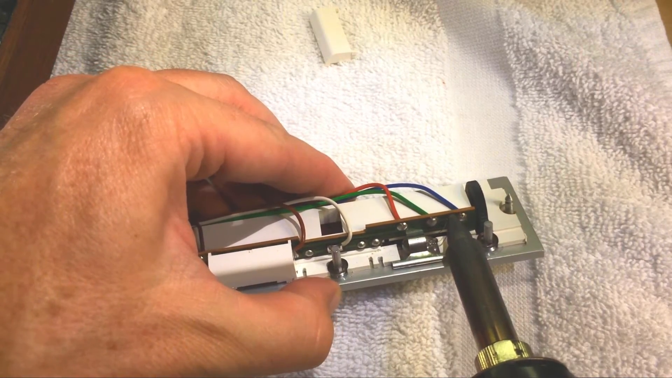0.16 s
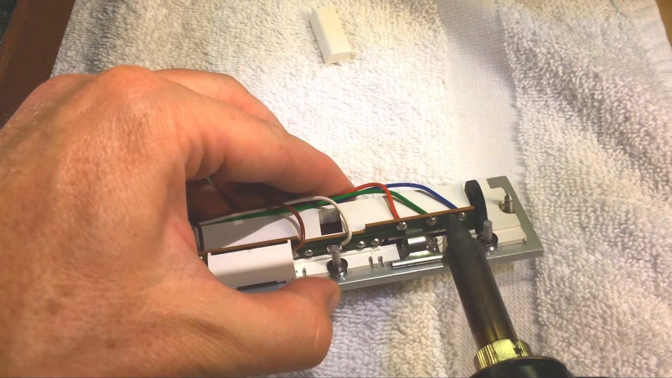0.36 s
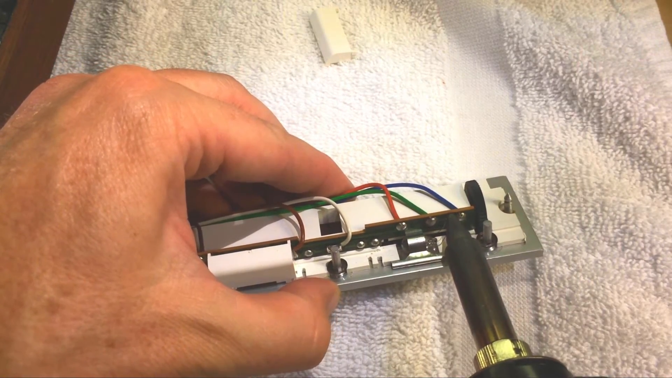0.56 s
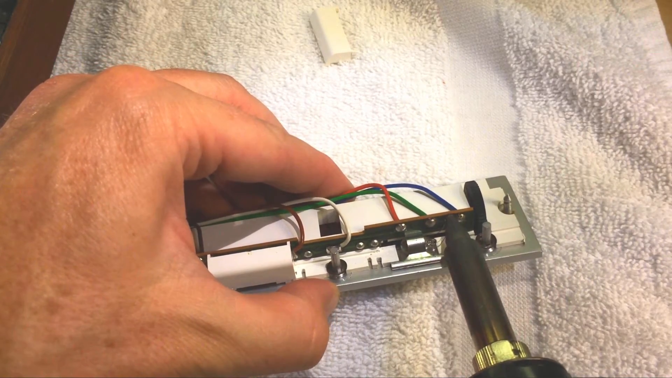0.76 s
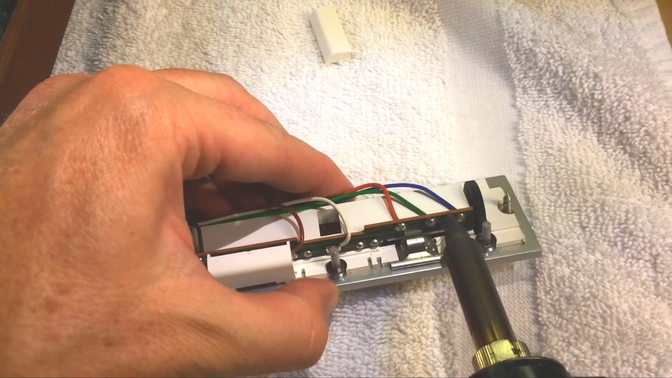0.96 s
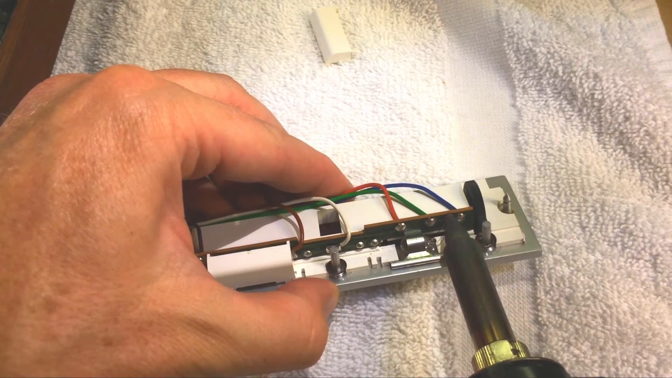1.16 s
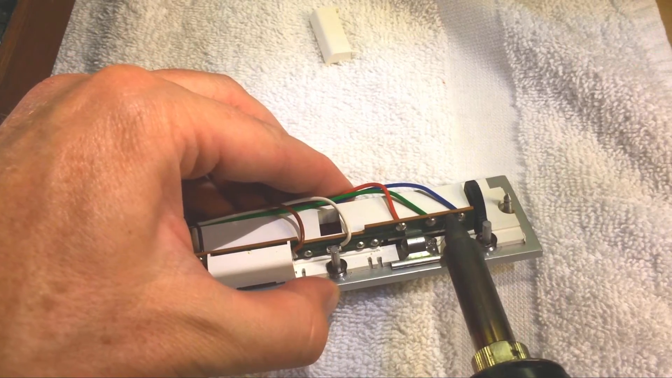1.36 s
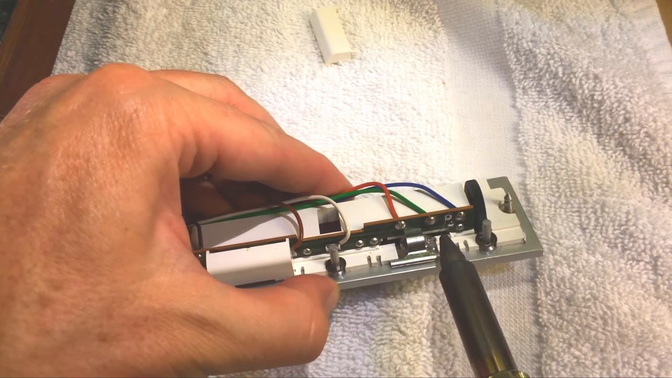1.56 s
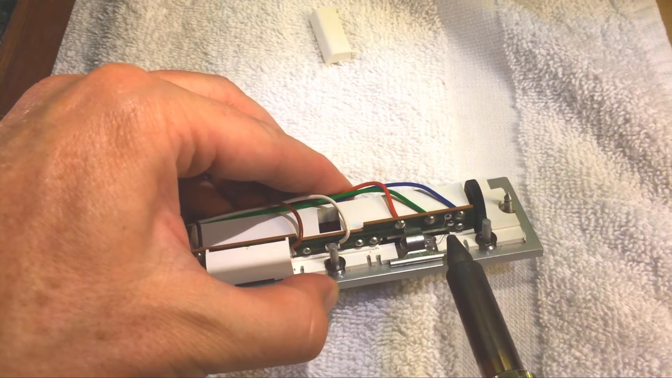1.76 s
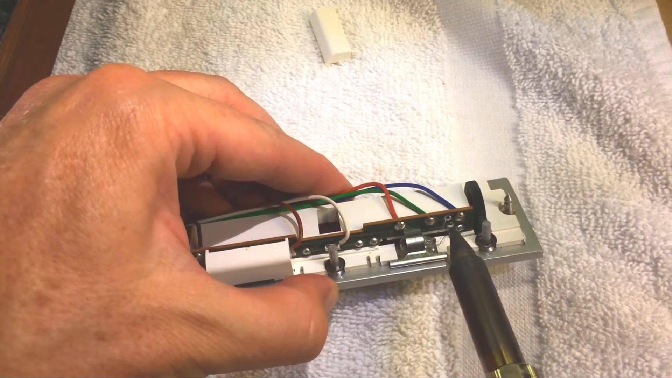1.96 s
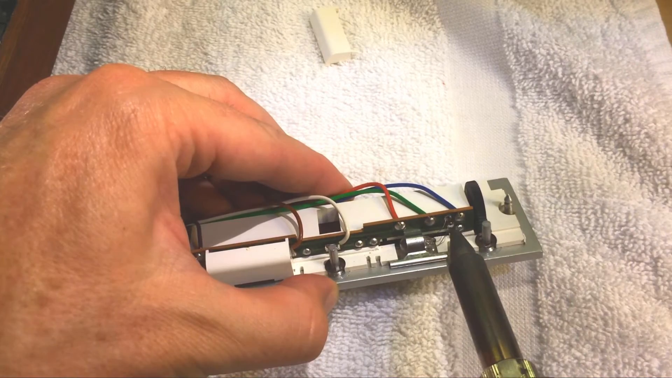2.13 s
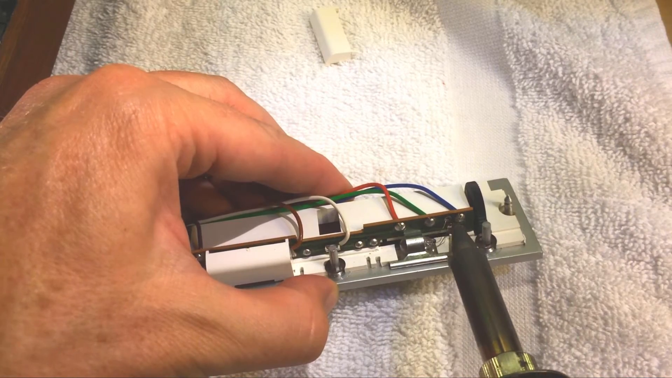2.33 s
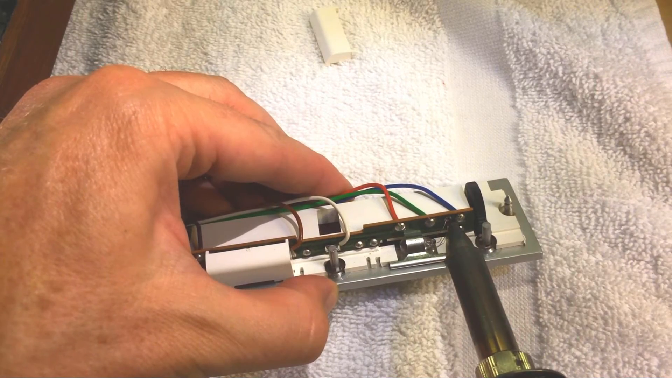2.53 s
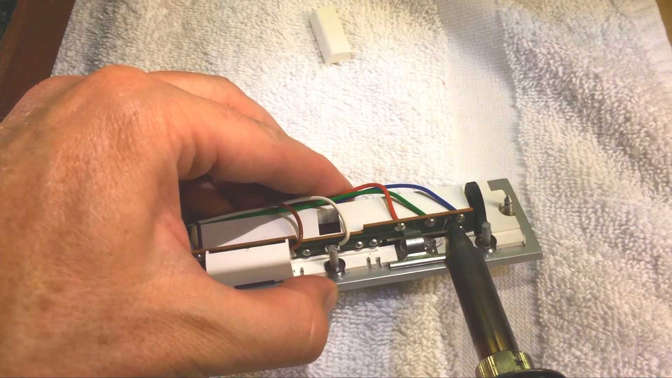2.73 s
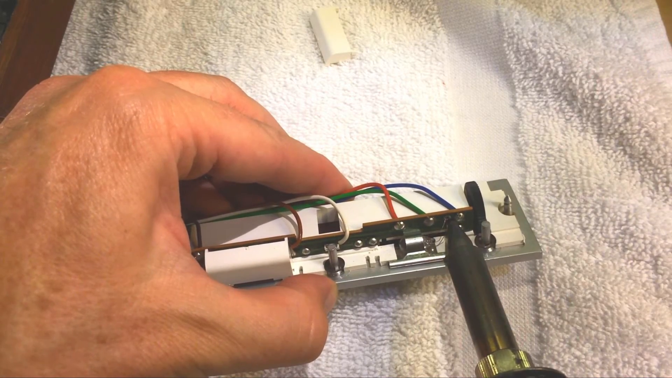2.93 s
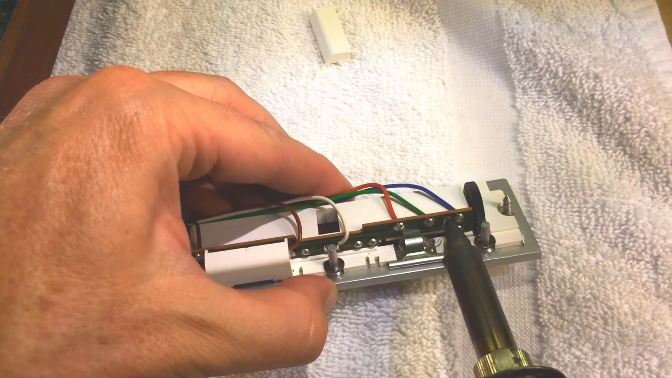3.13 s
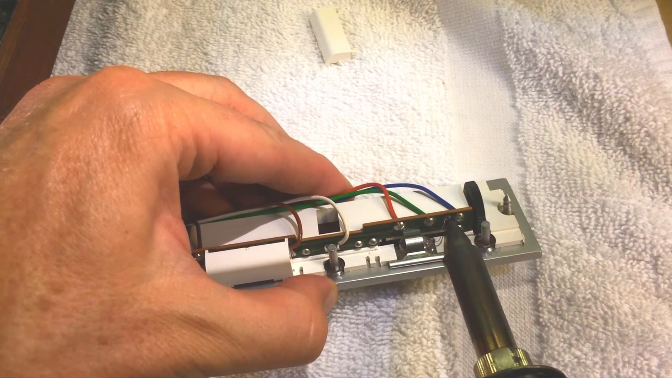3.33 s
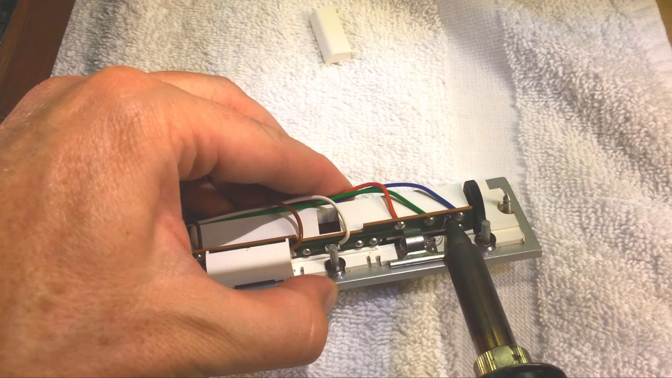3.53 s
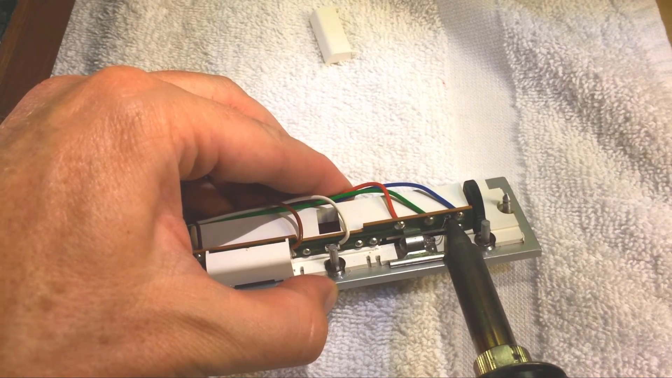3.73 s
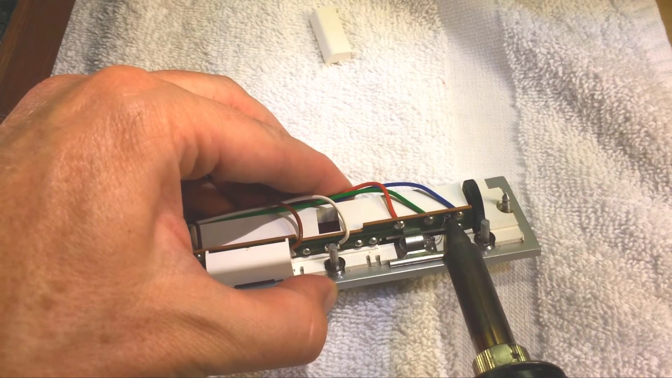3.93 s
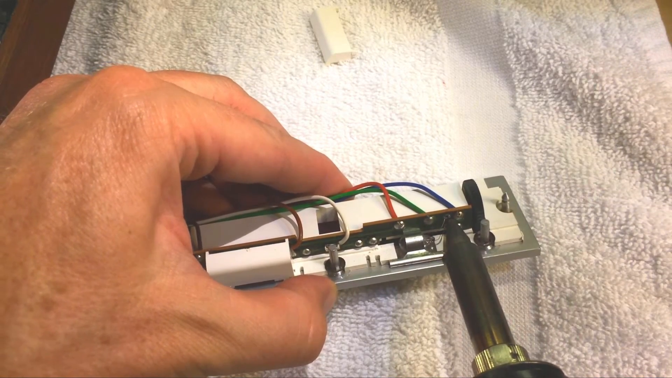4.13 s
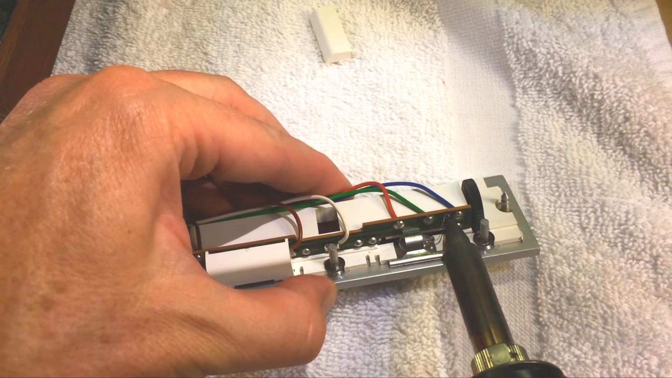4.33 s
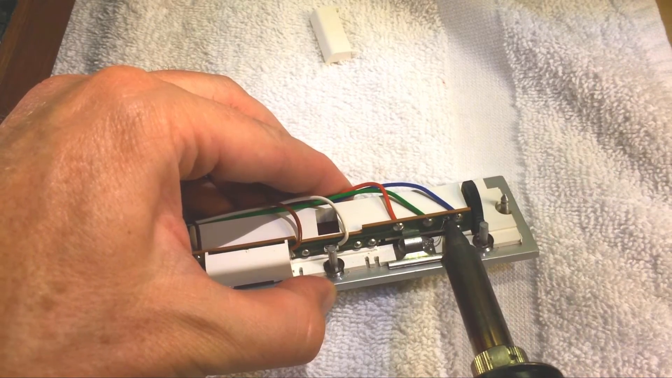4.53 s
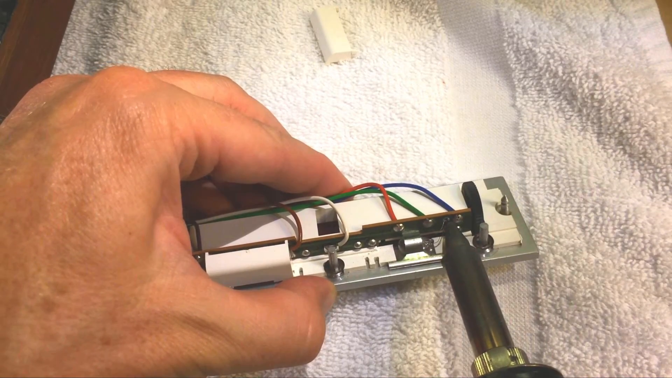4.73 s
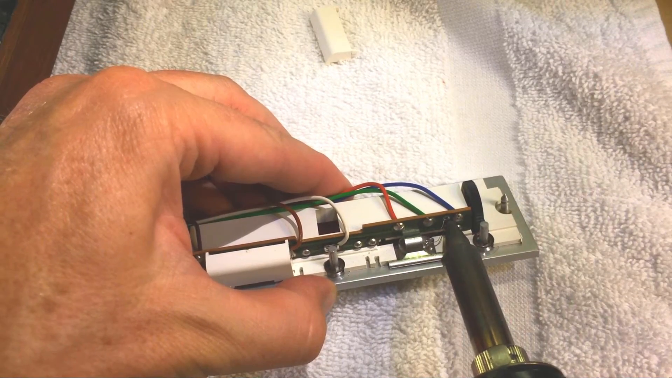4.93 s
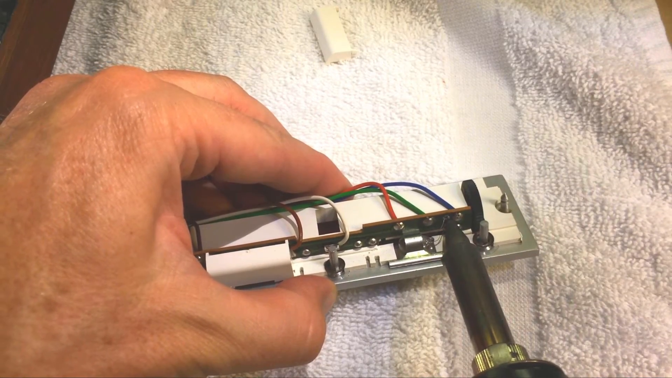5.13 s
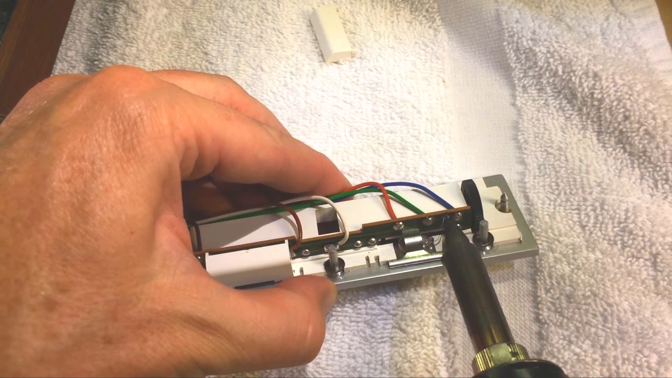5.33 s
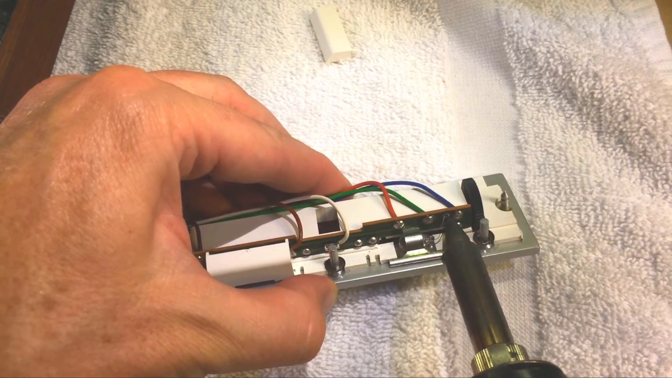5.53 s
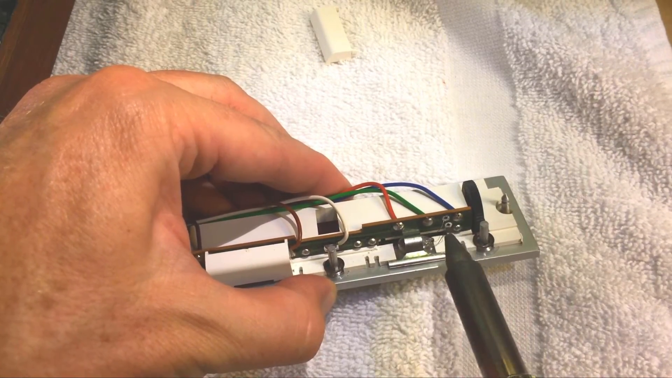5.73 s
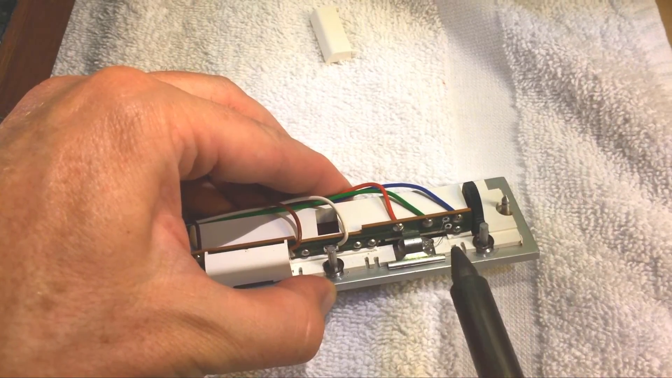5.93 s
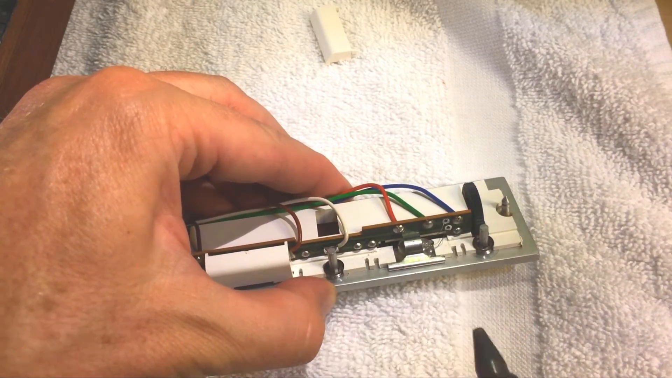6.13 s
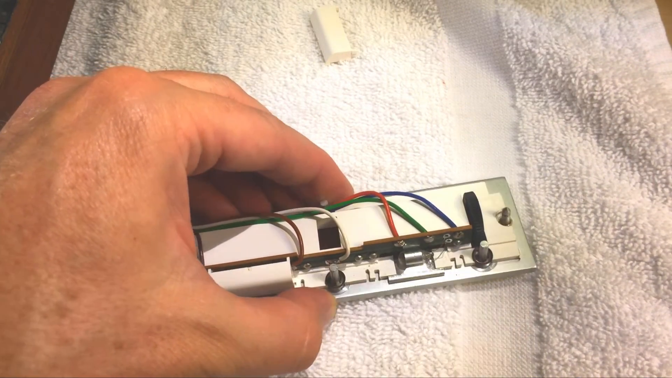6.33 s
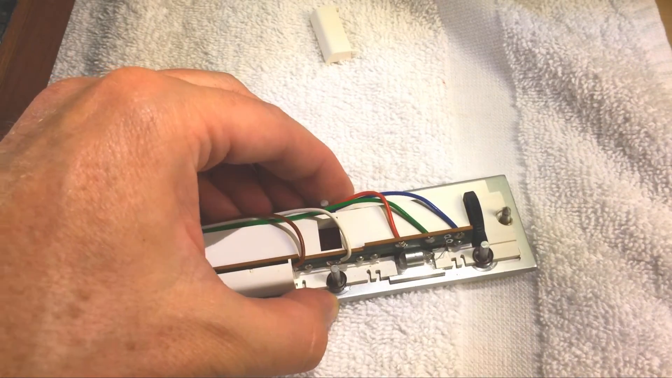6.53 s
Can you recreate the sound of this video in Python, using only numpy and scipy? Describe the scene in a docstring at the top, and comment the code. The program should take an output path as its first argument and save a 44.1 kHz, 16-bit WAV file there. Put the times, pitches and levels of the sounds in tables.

```python
"""An electric desoldering gun runs twice over a circuit board, close to one microphone at a workshop bench.
Its diaphragm pump hums, knocks twice a turn and puffs air through its valves. In the longer run solder
seals the nozzle: the motor slows, one hard knock a turn remains, and air slurps through the melt until
the seal breaks. The trigger snaps and the tip grazes the board; behind them lies a quiet, small room."""
import sys
import numpy as np
from scipy import signal
from scipy.fft import rfft, irfft
from scipy.io import wavfile
from scipy.ndimage import uniform_filter1d

SR = 44100
rng = np.random.default_rng(int(sys.argv[2]) if len(sys.argv) > 2 else 0)


def store_wav(level_fs):
    """Save 16-bit WAV to argv[1]."""
    pcm = np.round(np.clip(np.atleast_2d(level_fs), -1, 1) * 32767)
    wavfile.write(sys.argv[1], SR, pcm.T.astype(np.int16))


N = 294720
TIME = np.arange(N) / SR

# how far solder closes the nozzle: time_s, seal (0 open, 1 sealed)
NOZZLE_SEAL = [(4.15, 0), (4.31, .5), (4.595, .52), (4.695, .96), (5.02, 1), (5.37, .953), (5.635, 1),
               (5.675, .55), (5.73, 0)]
# loudness of each part of the pump: settled_db, surge_db, settle_s, sealed_change_db
HUM_LEVEL = (-37.5, 6.5, 0.37, -2.5)
KNOCK_LEVEL = (-35.5, 6, 0.67, 0.1)
AIR_LEVEL = (-47.5, 8, 2.5, -1.57)

def pump():
    """The gun up close: one motor drives hum, knocks, rattle and air. Returns sound and crank turns."""
    age, released = run_clock()
    seal = np.interp(TIME, *np.transpose(NOZZLE_SEAL))
    speed = motor_speed(age, released, seal)
    turns = crank(speed)
    acceleration = uniform_filter1d(np.abs(np.gradient(speed)) * SR, size=2000)
    unsteady = np.clip(acceleration / 150, 0, 1)
    rattle = works_rattle(turns, seal, unsteady)
    low = loudness(HUM_LEVEL, age, released, seal) * hum(turns, speed, seal)
    knocking = from_db(-1.5) * (1 - 0.4 * unsteady) * knocks(turns, seal)
    middle = loudness(KNOCK_LEVEL, age, released, seal) * (knocking + rattle)
    air = loudness(AIR_LEVEL, age, released, seal) * valves(turns, seal)
    return low + middle + air, turns


def motor_speed(age, released, seal):
    """Turns per second: the motor spins up, settles, labours against the vacuum and coasts down."""
    free_hz, surge_hz, climb_hz, load_hz = 72.7, 3.8, 19, 8.9
    inertia_s, settle_s, coast_s = .041, .64, .09
    lag = np.exp(-1 / (inertia_s * SR))
    load = signal.lfilter([1 - lag], [1, -lag], seal ** 5)
    unloaded = free_hz + surge_hz * np.exp(-age / settle_s) - climb_hz * np.exp(-age / inertia_s)
    return (unloaded - load_hz * load) * np.exp(-np.minimum(released, 2 * coast_s) / coast_s)


def crank(speed):
    """Turns made so far; each run starts from the same rest position."""
    turns = np.cumsum(speed * (1 + 0.0012 * drift(30))) / SR
    for pressed, _ in TRIGGER_HOLDS:
        start = int((pressed + START_LAG_S) * SR)
        turns[start:] += -turns[start] % 1
    return turns


def loudness(level, age, released, seal):
    """Gain of one part of the pump: quick attack, a surge that settles, a shift when sealed, release."""
    attack_s, release_db_per_s = 0.012, 560
    settled_db, surge_db, settle_s, sealed_db = level
    held_db = settled_db + surge_db * np.exp(-age / settle_s) + sealed_db * seal ** 2
    return from_db(held_db - release_db_per_s * released) * (1 - np.exp(-age / attack_s))


# pump body with air flowing, and under vacuum: pitch_hz, width_hz, level_db
OPEN_MODES = [(1279, 68, -1), (1401, 70, -1), (1703, 32, -2.5), (1809, 62, -2), (1940, 153, -1),
              (2034, 32.4, 6), (2365, 44, -5), (2900, 37, -21), (3680, 230, -18.5), (4960, 33, -20)]
SEALED_MODES = [(1125, 22, 6.5), (1363, 111, 7.5), (1717, 61, 3.5), (1855, 170, 3.5), (2334, 30, 4),
                (3890, 570, -6), (5370, 350, -6.5)]

def knocks(turns, seal):
    """Two strokes a turn ring the body; suction hardens them into slaps, and full vacuum leaves one."""
    forth = strokes(turns, 0, jitter_s=.000018, uneven_db=.45)
    back = 0.58 * strokes(turns, .58, jitter_s=.00002, uneven_db=1.0)
    flowing = sum((-1) ** k * from_db(db) * resonate(forth + back, hz, width)
                  for k, (hz, width, db) in enumerate(OPEN_MODES))
    flowing = evened(cut(flowing, 1130, "high", order=4))
    rebound = 0.94 * (1 - seal) * strokes(turns, .45, jitter_s=.00002, uneven_db=1.5)
    slap = cut(rebound - forth, 2580, "low")
    ring = sum(from_db(db) * resonate(slap, hz, width) for hz, width, db in SEALED_MODES)
    thud = from_db(-8.0) * resonate(cut(slap, 1700, "low"), 1200, 2000)
    tight = evened(cut(ring + thud, 1130, "high", order=3))
    hardness = np.clip(seal * 1.75, 0, 1)
    return evened(np.sqrt(1 - hardness ** 2) * flowing + hardness * tight)


# hum with the nozzle open, half closed and sealed: harmonic, level_db
HUM_OPEN = [(1, -10), (2, -22), (3, -11), (4, -3), (5, -7), (6, -14), (7, 0), (8, -16), (9, -4), (10, -7),
            (11, -15), (12, -14), (13, -18), (14, -11), (15, -6)]
HUM_HALF = [(1, -9), (2, -21), (3, -9), (4, -7), (5, -6), (6, -13), (7, -7), (8, -6), (9, -5), (10, -8),
            (11, -18), (12, 0), (13, -7), (14, -7), (15, -9)]
HUM_SEALED = [(1, -10), (2, -13), (3, -11), (4, -8), (5, -5), (6, -8), (7, -5), (8, -3), (9, -19), (10, -9),
              (11, -22), (12, -8), (13, -5), (14, 0), (15, -5)]

def hum(turns, speed, seal):
    """Diaphragm harmonics boom as they meet the handle's resonance; vacuum draws them into one pulse."""
    handle_hz, handle_width_hz, handle_db = 287, 6, 5
    out = np.zeros(N)
    phases = rng.uniform(-np.pi, np.pi, len(HUM_OPEN))
    spread = 1 - .68 * np.sqrt(seal)
    for (k, free), (_, half), (_, sealed), phase in zip(HUM_OPEN, HUM_HALF, HUM_SEALED, phases):
        db = np.interp(seal, [0, .5, 1], [free, half, sealed]) + 0.76 * drift(17)
        boom_db = handle_db * np.exp(-((k * speed - handle_hz) / handle_width_hz) ** 2)
        out -= from_db(db + boom_db) * np.cos(2 * np.pi * k * (turns - .025) + phase * spread)
    return evened(out)


# air through the valves, and the hiss of the sealed nozzle: frequency_hz, density_db
VALVE_AIR = [(1530, 6), (2600, -2.5), (3020, 3.5), (3280, -1.5), (3780, -1), (4290, -4), (4800, 0),
             (5170, -3.5), (7020, -7), (7570, -8.5), (9610, -11), (14700, -19), (15500, -22)]
SEALED_HISS = [(1650, 0.5), (2800, -3), (3160, -7.5), (3980, -5), (4490, -11.5), (5220, -5.5), (5650, -11),
               (6020, -8), (10200, -16), (14500, -18.5), (15500, -18)]

def valves(turns, seal):
    """The exhaust flap ticks, rasps and puffs; under vacuum a hollow puff follows each slap, over hiss."""
    exhaust = puff(turns, 0.52, decay_turns=0.51, steady=0.95) * noise(VALVE_AIR)
    ticks = flap_ticks(turns)
    gasp = noise(SEALED_HISS) * puff(turns, 0.034, decay_turns=0.084, steady=0.068)
    hollow = rms_one(resonate(gasp, 3560, 530) + 0.63 * resonate(gasp, 4830, 300) + 0.42 * gasp)
    open_rasp = rasp(strokes(turns, .45, jitter_s=.000015, uneven_db=2.1), VALVE_AIR, decay_s=0.015)
    tight_rasp = rasp(strokes(turns, .0395, jitter_s=.000015, uneven_db=.5), SEALED_HISS, decay_s=0.013)
    thin_hiss = noise(SEALED_HISS) * puff(turns, 0.051, decay_turns=0.67, steady=2.2)
    flowing = from_db(-2.0) * exhaust + from_db(-12.0) * ticks + from_db(-6.5) * open_rasp
    sealed = from_db(-6.0) * hollow + from_db(-5.5) * thin_hiss + from_db(-8) * tight_rasp
    return np.sqrt(1 - seal ** 2) * flowing + seal * sealed


def flap_ticks(turns):
    """The exhaust flap strikes twice a turn and rings brightly; rms 1."""
    flap = strokes(turns, .45, jitter_s=.00004, uneven_db=2.5)
    flap += 0.83 * strokes(turns, .62, jitter_s=.00006, uneven_db=5.0)
    ring = resonate(flap, 7440, 310) - 1.2 * resonate(flap, 8330, 260) + 0.41 * resonate(flap, 4880, 120)
    return rms_one(ring + .15 * cut(flap, 3200, "high"))


def rasp(clicks, spectrum, decay_s):
    """Each click sets off the same short rattle of a valve, so its hiss is pitched; rms 1."""
    rattle = (noise(spectrum) * np.exp(-TIME / decay_s))[:SR // 20]
    return rms_one(signal.fftconvolve(clicks, rattle)[:N])


# rattle inside the gun: frequency_hz, density_db
WORKS_NOISE = [(150, -14.5), (400, -12.5), (800, -8.5), (1400, -3), (2000, -2), (2600, -13.5), (3500, -63)]

def works_rattle(turns, seal, unsteady):
    """The works rattle each turn: less under vacuum, more while the speed changes."""
    slack = from_db(-9.5) * (1 - .45 * seal) + from_db(-6) * unsteady
    return noise(WORKS_NOISE) * puff(turns, 0, decay_turns=0.49, steady=0.84) * slack


# brief bright swells from the gun: peak_s, half_length_s, centre_hz, width_hz, level_db
BRIGHT_SWELLS = [(0.655, 0.025, 5100, 900, -37), (0.72, 0.041, 5000, 250, -48),
                 (4.225, 0.024, 5100, 1500, -44), (4.682, .005, 10000, 8000, -53),
                 (4.82, 0.074, 8300, 2570, -51), (4.84, 0.055, 6300, 1200, -52),
                 (5.115, 0.037, 8500, 1500, -50), (5.172, 0.05, 9900, 2400, -50.5),
                 (5.215, .028, 12300, 4000, -56.5), (5.66, .014, 11500, 8000, -51),
                 (5.792, .008, 6500, 5000, -54)]

def rattle_and_slurps(turns):
    """A rattle as the motor starts, then spits, pops and slurps at the nozzle, pulsing with the pump."""
    return hisses(BRIGHT_SWELLS, grain_db=3.0) * puff(turns, 0.19, decay_turns=0.48, steady=1.0)


# finger on the trigger: pressed_s, let_go_s
TRIGGER_HOLDS = [(0.580, 1.491), (4.169, 5.792)]
# snap of the switch: frequency_hz, density_db
SWITCH_SNAP = [(500, 1), (2000, 1), (2900, -4), (4200, -4), (6000, -2.5), (7700, -18), (9000, -7),
               (11000, -20), (12700, -16), (15500, -18)]
START_LAG_S = .018

def trigger():
    """The switch snaps just before the motor starts."""
    snaps = sum((TIME >= pressed) * np.exp(-np.abs(TIME - pressed) / 0.0047)
                for pressed, _ in TRIGGER_HOLDS)
    return from_db(-42) * snaps * noise(SWITCH_SNAP)


def run_clock():
    """Seconds since the motor last started, and since the trigger was let go (0 while it is held)."""
    age, released = np.zeros(N), np.zeros(N)
    for pressed, let_go in TRIGGER_HOLDS:
        now = TIME >= pressed + START_LAG_S
        age[now] = TIME[now] - pressed - START_LAG_S
        released[now] = np.maximum(TIME[now] - let_go, 0)
    return age, released


# faint scrapes on the board: peak_s, half_length_s, centre_hz, width_hz, level_db
TIP_GRAZES = [(2.29, .04, 6000, 3500, -77), (6.35, 0.088, 6400, 4000, -79)]

def tip_grazes():
    """The tip brushes the board after each run."""
    return hisses(TIP_GRAZES, grain_db=4)


# handling noise: peak_s, half_length_s, centre_hz, width_hz, level_db
HANDLING_BUMP = [(4.7, .045, 32, 30, -44)]

def handling_bump():
    """A soft, very low thump of a hand or of the microphone being nudged."""
    return hisses(HANDLING_BUMP, grain_db=0)


def workshop(x, t60_s, wet_db):
    """A short room tail behind the close sound; metal modes near 4.6 kHz hang on a little longer."""
    metal_t60_s, metal_db = .5, -29.5
    t = TIME[:SR // 2]
    tail = cut(rng.standard_normal(len(t)), 9800, "low", order=1) * from_db(-60 * t / t60_s) * (t > .004)
    metal = cut(rng.standard_normal(len(t)), [4350, 4950], "band") * from_db(-60 * t / metal_t60_s)
    echo = from_db(wet_db) * tail / np.linalg.norm(tail)
    echo += from_db(metal_db) * metal / np.linalg.norm(metal)
    return x + signal.fftconvolve(x, echo)[:N]


# the quiet room around the bench: frequency_hz, density_db
ROOM_TONE = [(12, -24), (20, 4.5), (38, -8), (148, -15.5), (196, -19), (232, -20), (333, -21.5),
             (372, -22.5), (505, -24.5), (906, -28), (1100, -29), (2210, -33.5), (4430, -46.5), (6190, -50),
             (15500, -58)]

def room_tone():
    """Steady rumble and faint hiss, well behind the gun."""
    return from_db(-51.5) * noise(ROOM_TONE)


def strokes(turns, angle, jitter_s, uneven_db):
    """One click a turn at a crank angle (in turns), a little uneven in time and strength."""
    at = np.interp(np.arange(1, int(turns[-1]) - 1) + angle, turns, np.arange(N))
    timing, strength = rng.standard_normal((1000, 2))[:len(at)].T
    at = np.clip(at + timing * jitter_s * SR, 0, N - 2)
    size = from_db(uneven_db * strength)
    whole, fraction = at.astype(int), at % 1
    clicks = np.zeros(N)
    clicks[whole] = size * (1 - fraction)
    clicks[whole + 1] += size * fraction
    return clicks


def puff(turns, angle, decay_turns, steady):
    """An envelope that jumps at a crank angle and sinks toward a steady floor each turn; rms 1."""
    return rms_one(steady + np.exp(-((turns - angle) % 1) / decay_turns))


def hisses(rows, grain_db):
    """Short swells of noise, each in its own band, roughened by grain_db."""
    source = rng.standard_normal(N) * from_db(grain_db * drift(550))
    return sum(from_db(db) * np.exp(-((TIME - peak_s) / half_length_s) ** 2)
               * rms_one(cut(source, [hz - width / 2, hz + width / 2], "band"))
               for peak_s, half_length_s, hz, width, db in rows)


def noise(spectrum):
    """Steady noise of a given colour that falls away past the ends; rms 1."""
    hz, db = np.transpose(spectrum)
    f = np.maximum(np.arange(N // 2 + 1) * SR / N, 1)
    ends = 1 / np.sqrt(1 + (hz[0] / f) ** 10 + (f / hz[-1]) ** 10)
    colour = from_db(np.interp(np.log(f), np.log(hz), db))
    return rms_one(irfft(rfft(rng.standard_normal(N)) * ends * colour, N))


def drift(rate_hz):
    """A smooth random wander with a spread near 1."""
    knots = rng.standard_normal(N // 8)
    return np.interp(TIME * rate_hz, np.arange(len(knots)), knots)


def resonate(x, hz, width_hz):
    """One resonance with gain 1 at its peak."""
    r = np.exp(-np.pi * width_hz / SR)
    feedback = [1, -2 * r * np.cos(2 * np.pi * hz / SR), r * r]
    return signal.lfilter(np.array([1, 0, -1]) * (1 - r * r) / 2, feedback, x + 1e-18)


def cut(x, hz, kind, order=2):
    """Low-, high- or band-pass filter with a flat passband."""
    sections = signal.butter(order, np.clip(hz, 10, .45 * SR), kind, fs=SR, output="sos")
    return signal.sosfilt(sections, x + 1e-18)


def evened(x):
    """Hold the power at 1 over a few turns."""
    power = uniform_filter1d(uniform_filter1d(x * x, size=2000), size=2600)
    return x / np.sqrt(np.abs(power) + 1e-14)


def rms_one(x):
    """Scale to unit power."""
    return x / np.sqrt(np.mean(x ** 2) + 1e-20)


def from_db(db):
    """Decibels to gain."""
    return 10 ** (np.asarray(db) / 20)


def scene():
    """Gun and board close by on the towel-covered bench, the room behind; mono."""
    buzz, turns = pump()
    near = buzz + rattle_and_slurps(turns) + trigger() + tip_grazes()
    floor = room_tone() + handling_bump()
    return (workshop(near, t60_s=0.29, wet_db=-12.5) + floor)[None]


def record(dry):
    """The microphone's signal, with the top treble cut steeply."""
    cutoff_hz = 15650
    return signal.sosfilt(signal.ellip(12, .1, 80, cutoff_hz, fs=SR, output="sos"), dry)


dry = scene()
out = record(dry)
store_wav(out)
```